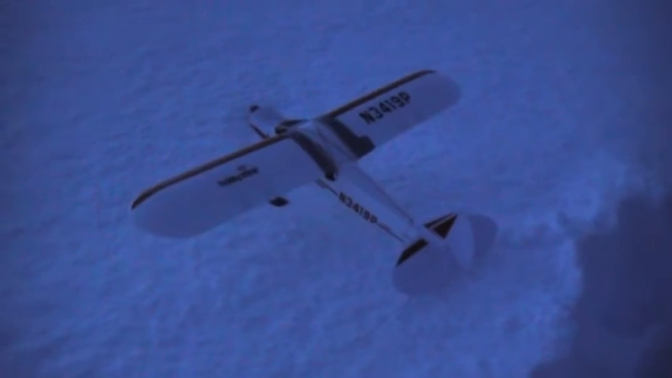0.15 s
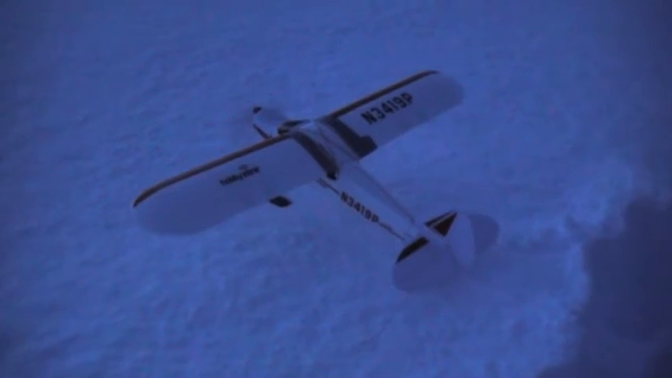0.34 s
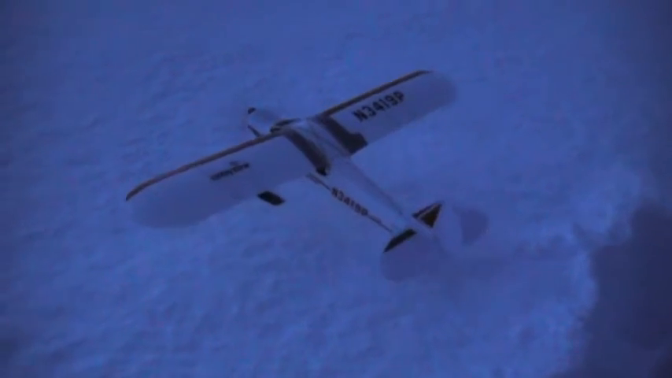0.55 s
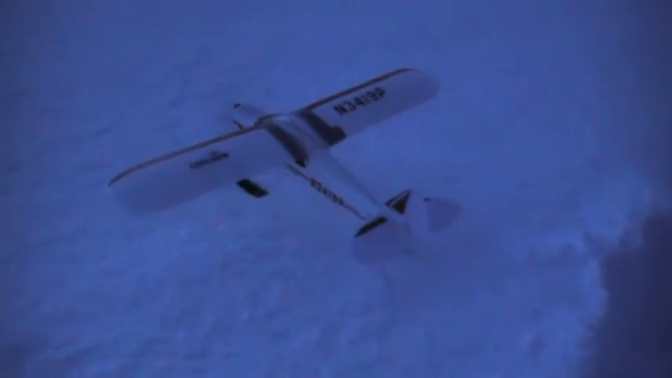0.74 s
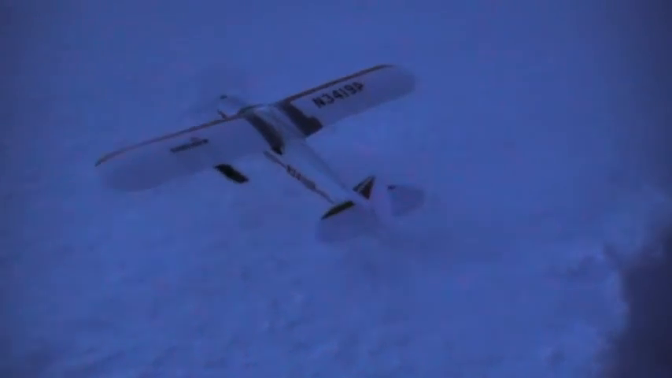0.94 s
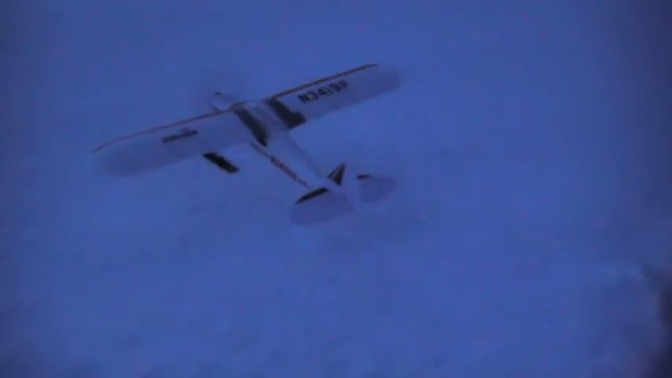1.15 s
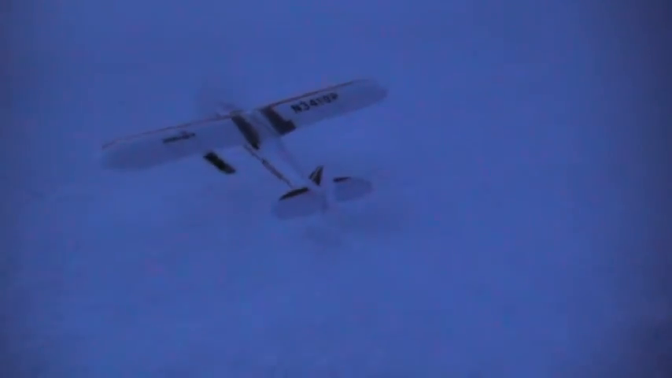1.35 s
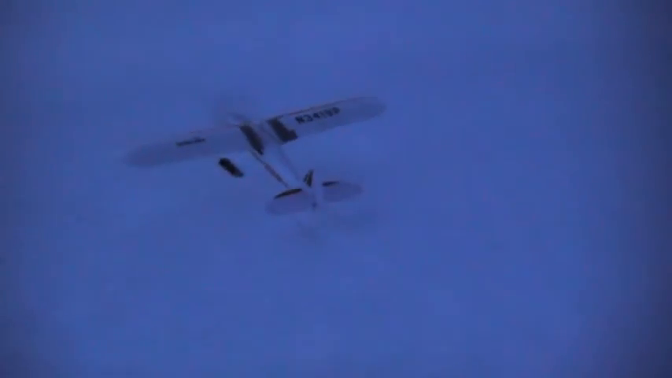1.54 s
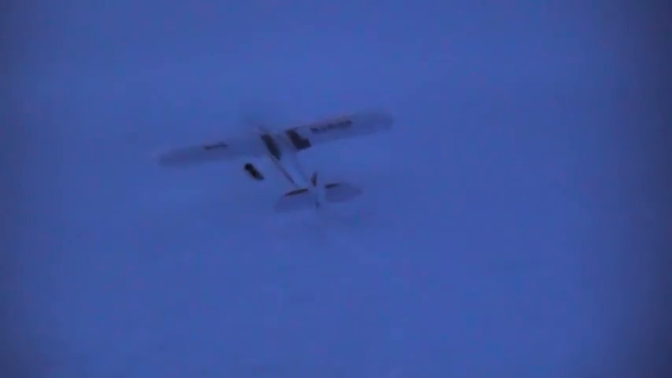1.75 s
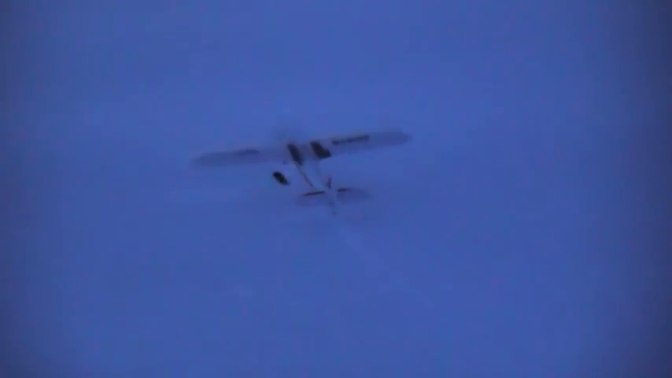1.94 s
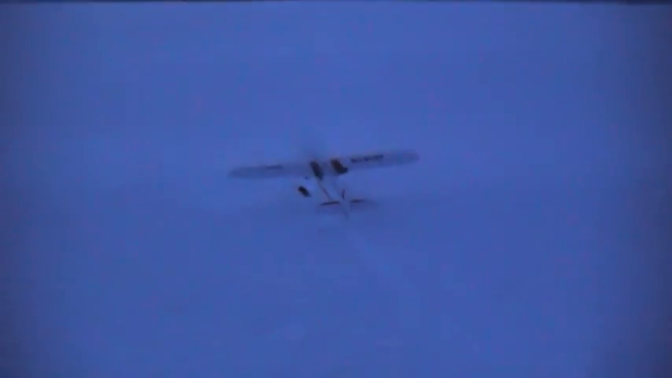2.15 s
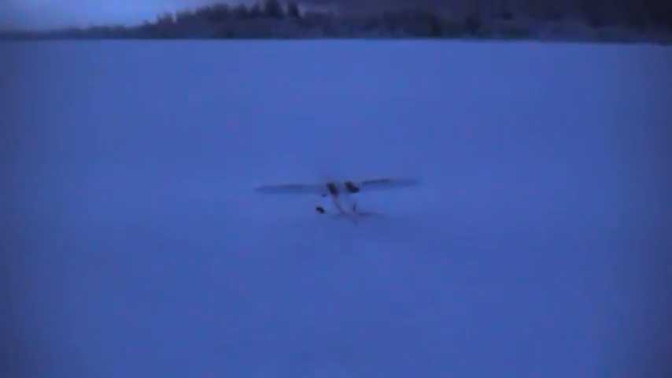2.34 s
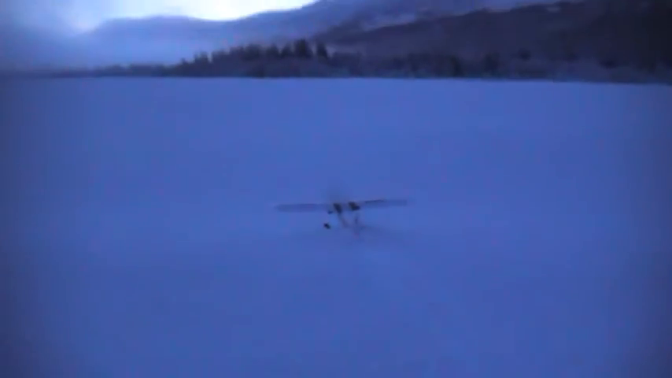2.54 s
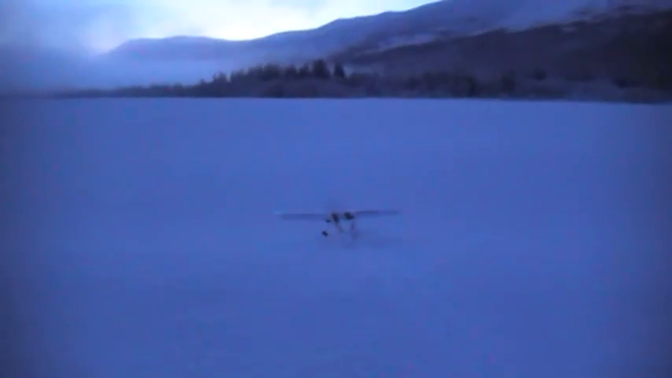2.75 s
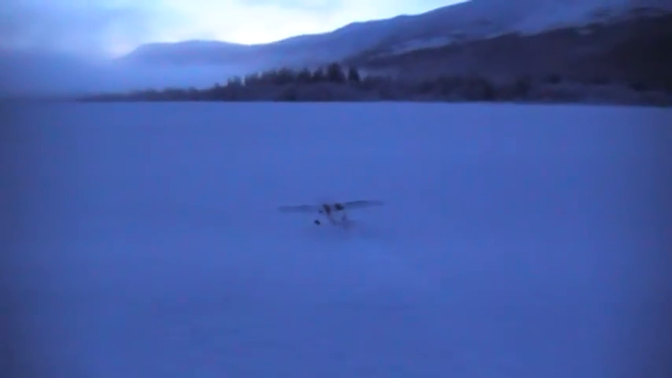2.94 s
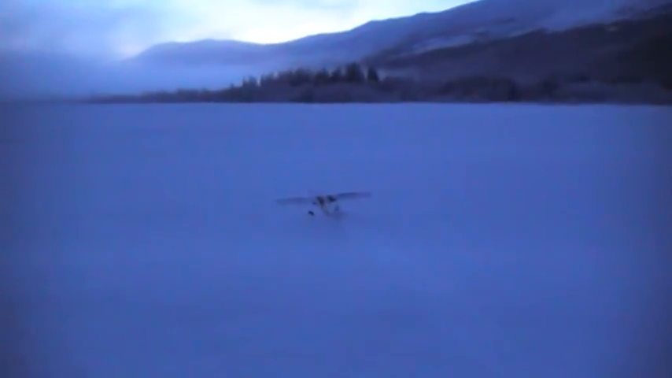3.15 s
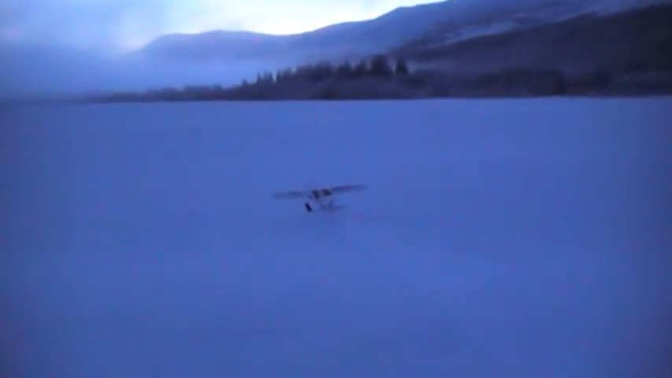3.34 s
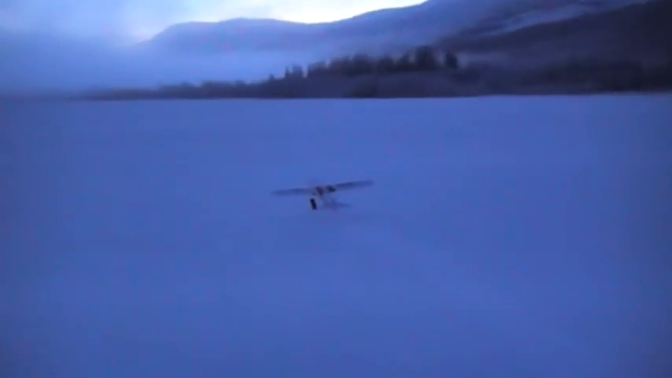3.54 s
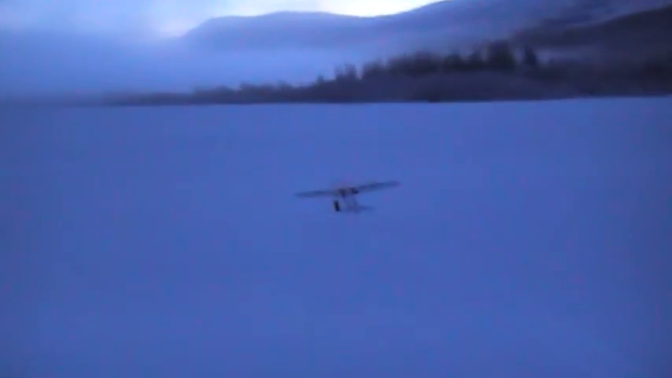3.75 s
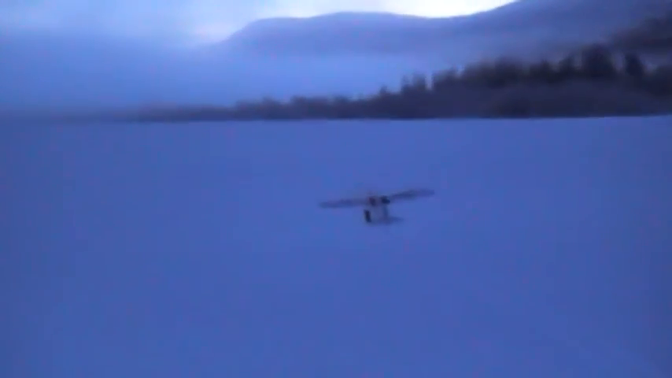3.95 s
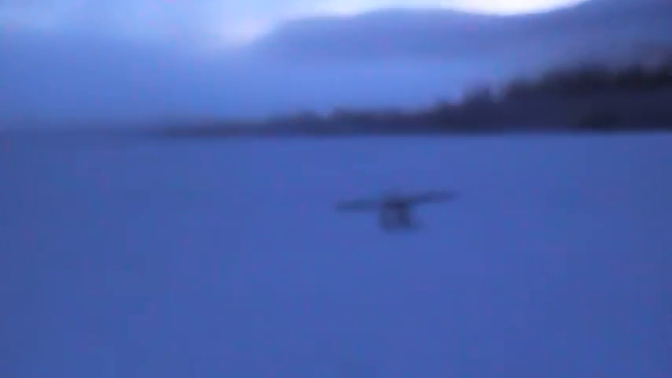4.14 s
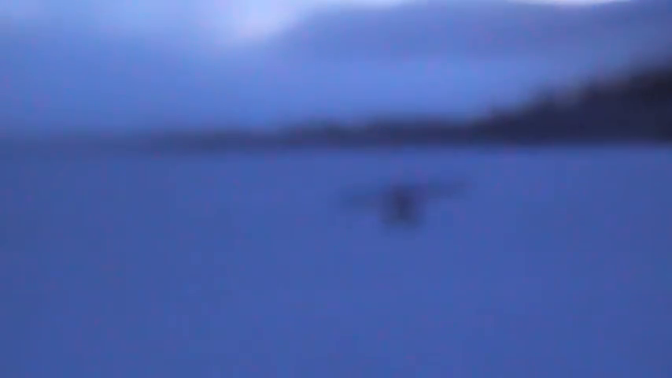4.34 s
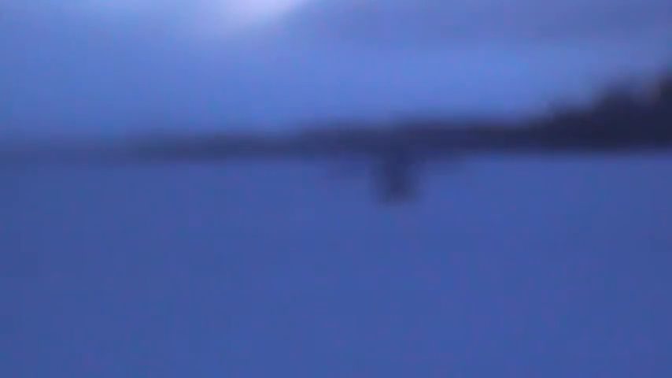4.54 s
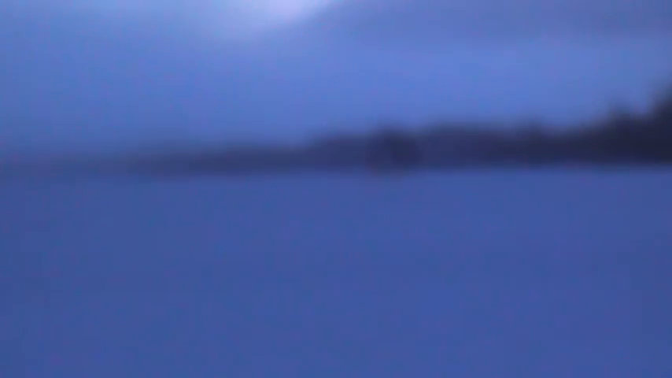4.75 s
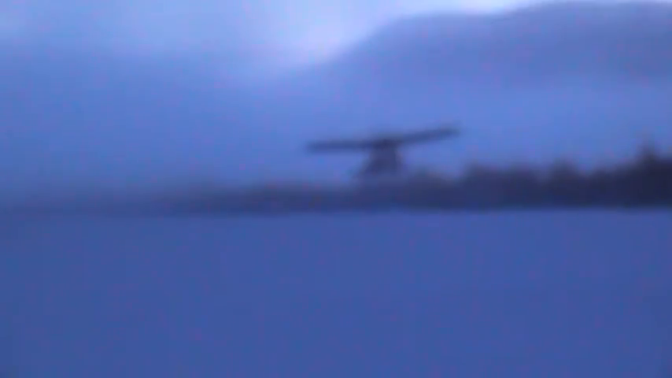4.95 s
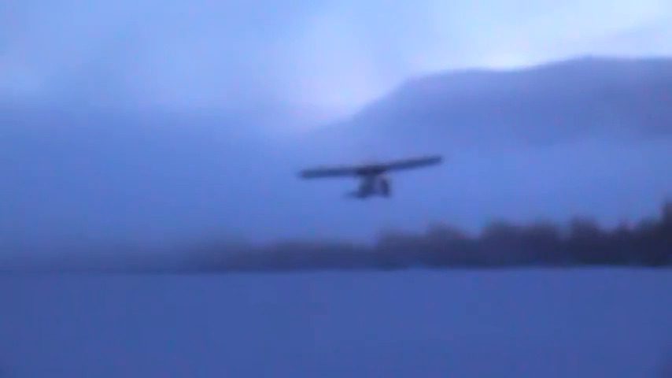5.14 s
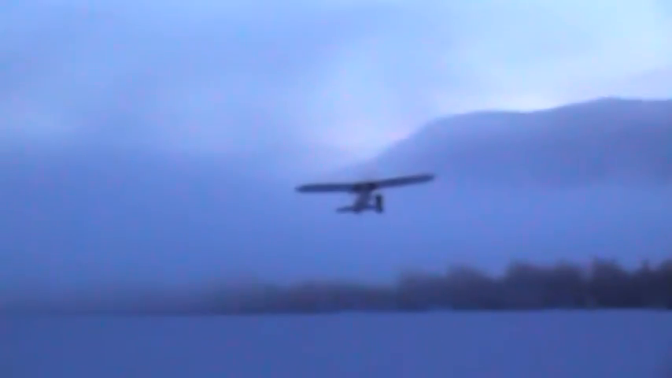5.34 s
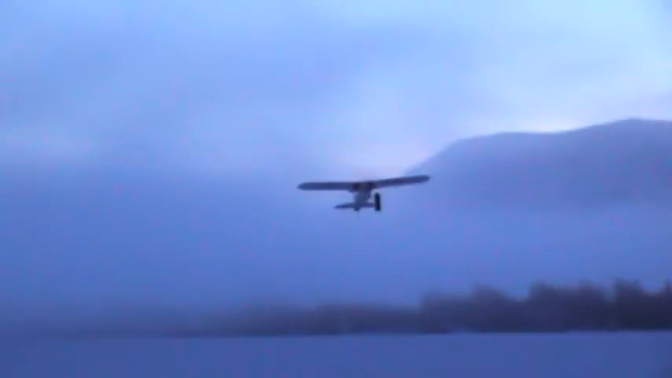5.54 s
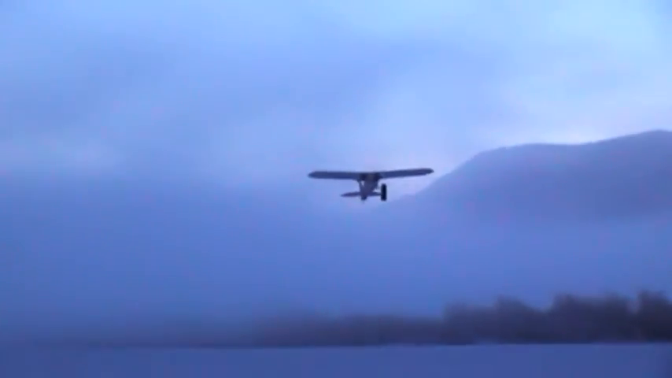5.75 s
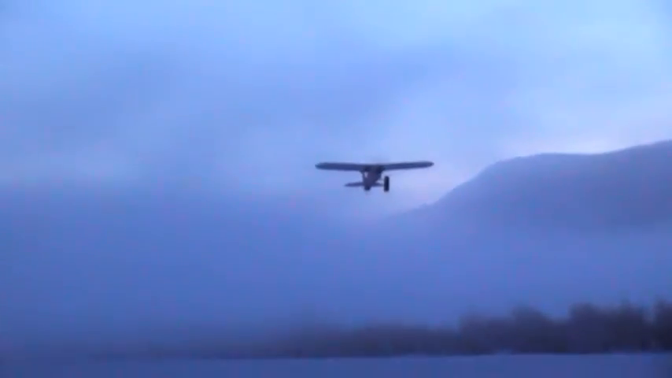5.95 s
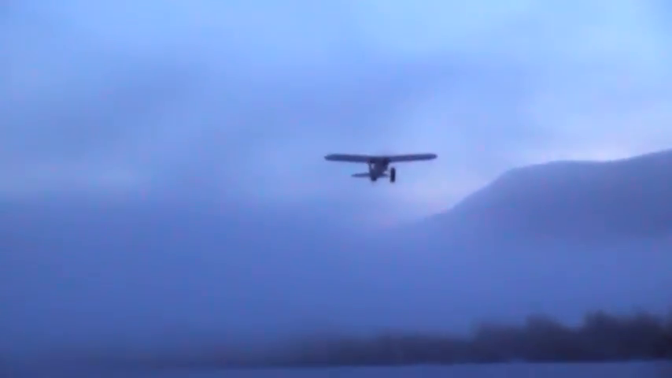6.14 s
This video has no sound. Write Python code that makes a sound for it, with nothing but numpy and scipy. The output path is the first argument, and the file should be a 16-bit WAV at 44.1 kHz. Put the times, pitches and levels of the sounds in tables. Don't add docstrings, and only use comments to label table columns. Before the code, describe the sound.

At 0 s a small electric model plane is already running close by on snow, with a rough, buzzing motor whine that climbs quickly until about 0.8 s. A thin singing tone near 1 kHz accompanies the rise, stuttering briefly around 0.5 and 0.6 s before vanishing. The motor then holds a nearly steady, piercing whine, with strong tones around 2.5 and 5 kHz, a low propeller buzz, fizzy treble and rushing air. From about 1.3 s it moves away, its brightness swelling and dipping. Fingers knock the plastic camera body in a flurry at 2.6-2.9 s, the sharpest near 2.6, with smaller taps at 3.2, 3.4 and 4 s and faint ones later. Around 3.8 s it lifts off; the shrinking sound turns hollow and phasey, duller after 4.9 s, still whining faintly at 6.3 s over light hiss.

```python
import sys
import numpy as np
from scipy import signal
from scipy.fft import rfft, irfft
from scipy.io import wavfile
from scipy.ndimage import uniform_filter1d, map_coordinates

SR = 44100
rng = np.random.default_rng(int(sys.argv[2]) if len(sys.argv) > 2 else 0)


def inscribe(sig):
    pcm = np.round(np.clip(np.atleast_2d(sig).T, -1, 1) * 32767)
    wavfile.write(sys.argv[1], SR, pcm.astype(np.int16))


def invert_db(level):
    return 10 ** (np.asarray(level, dtype=float) / 20)


N = 277389
STEPS_PER_TURN = 36
FRAMES, POINTS, LINES_MAX = 256, 8192, 340


def curves(table, s):
    t, *columns = np.transpose(table)
    return [np.interp(s, t, column) for column in columns]


def on_log(table, hz):
    table_hz, value = np.transpose(table)
    return np.interp(np.log(hz + 1), np.log(table_hz + 1), value)


def unit(x):
    return x / np.std(x)


def swings(table, s):
    return sum(db * np.exp(-((s - at) / length) ** 2) for at, db, length in table)


# frequency in Hz, density in dB per Hz.
FLOOR = [(15, -16), (70, -6.5), (200, -10.5), (500, -4), (1500, -13.5), (4000, -17), (9000, -16),
         (15500, -28)]


def floor(level_db=-55.5, side_share=0.41):
    colour = invert_db(on_log(FLOOR, np.fft.rfftfreq(N, 1 / SR)))
    mid, side = (unit(irfft(rfft(rng.standard_normal(N)) * colour, N)) for _ in range(2))
    return invert_db(level_db) * (mid + side_share * side * np.array([[1], [-1]]))


# start in seconds, peak in dB, shell pitch in Hz,
# thump in dB and click in dB relative to the peak.
KNOCKS = [(2.569, -35, 619, -18, 8), (2.582, -19.5, 345, -29, -4), (2.639, -33.5, 272, -13, 6),
          (2.679, -36, 277, -4, -6), (2.748, -25.5, 262, -23, -5), (2.781, -28.5, 315, -19, -1),
          (2.869, -36.5, 272, -16, 3), (2.889, -41, 611, -9, 2), (2.911, -28, 678, -16, -5),
          (2.943, -27.5, 700, -3, 2.5), (3.236, -26.5, 247, -14, 1.5), (3.391, -34, 670, -22, -3),
          (3.958, -41, 550, -16, 3), (4.759, -53, 408.5, -16, 13), (5.389, -44, 409, -17, -5),
          (5.827, -33.5, 403, -19, -7)]


def knocks(t60=0.02, thump_hz=70, thump_t60=.07, click_hz=1000, click_t60=0.019, crack_db=-1, crack_s=0.0029):
    out = np.zeros(N)
    t = np.arange(int(.15 * SR)) / SR
    rise = 1 - np.exp(-t / 0.00076)
    dull = signal.butter(2, [200, 1800], "band", fs=SR, output="sos")
    for start_s, db, shell_hz, thump_db, click_db in KNOCKS:
        modes = [(shell_hz, db, t60),
                 (thump_hz, db + thump_db - 4, thump_t60),
                 (click_hz, db + click_db, click_t60)]
        ring = sum(invert_db(d) * np.sin(2 * np.pi * f * t) * 1000 ** (-t / decay) for f, d, decay in modes)
        grit = unit(signal.sosfilt(dull, rng.standard_normal(len(t))))
        crack = invert_db(db + click_db + crack_db) * grit * np.exp(-t / crack_s)
        out[int((start_s + .002) * SR):][:len(t)] += 1.29 * rise * (ring + crack)
    return out


# time in seconds, swing in dB, length in seconds.
WING = [
    (.508, -18, 0.018),
    (.635, -11, .025),
]


def wing(t, tone_hz=975, level_db=-29.5, db_per_s=-14):
    fade = np.clip((.8 - t) / 0.079, 0, 1)
    level = np.sqrt(2) * invert_db(level_db + db_per_s * t + swings(WING, t))
    return level * fade * np.sin(2 * np.pi * tone_hz * t)


# time in seconds, motor steps in Hz.
TURN = [(0, 1750), (.1, 1833), (.2, 1893), (.3, 1992), (.4, 2148), (.5, 2277), (.6, 2370), (.7, 2471),
        (.77, 2499), (.93, 2507), (1.1, 2495), (1.5, 2479), (2.1, 2459), (3.15, 2439), (4.3, 2441),
        (4.7, 2447), (5.6, 2436), (6.29, 2437)]


def step_rate(s):
    return curves(TURN, s)[0]


def missing(s, full_hz=2500, start_hz=1750):
    return np.clip((full_hz - step_rate(s)) / (full_hz - start_hz) * (s < 1), 0, 1)


# time in seconds, loss by distance in dB,
# shading of the treble in dB.
FLIGHT = [(0, -0.5, -5.5), (.33, 0.5, -1.5), (.8, 0, -1), (1.35, 3, -2), (1.6, 4.5, -1), (1.95, 4.5, -4),
          (2.3, 6, -3), (2.55, 7, -8.5), (2.9, 8.5, -6.5), (3.25, 9.5, -7.5), (3.73, 12, -5.5),
          (4.05, 15, -3.5), (4.5, 16.5, -5.5), (4.9, 20, -10.5), (5.1, 20.5, -11.5), (5.3, 22, -9.5),
          (5.7, 22.5, -8), (6.29, 24.5, -8.5)]


def flight(s):
    return curves(FLIGHT, s)


# time in seconds, extra delay in ms,
# mirrored share for the weak lines.
MIRROR = [(0, 0.13, 0), (3.2, 0.073, 0.033), (3.6, 0.1, 0), (3.85, 0.21, 0.15), (4.21, .41, 0.24),
          (4.45, 0.57, 0.6), (4.76, 0.81, 0.31), (4.9, 0.98, 0.61), (5.1, 1.036, 0.85), (5.7, 1.23, 0.58),
          (6.29, 1.35, 0.35)]


def mirror(s):
    lag_ms, share = curves(MIRROR, s)
    return lag_ms / 1000, share


def comb(hz, lag_s, share):
    return np.abs(1 - share * np.exp(-2j * np.pi * hz * lag_s))


def glance(s, hz, share, snow_share=0.79, glance_db=7):
    flatness = 1 - np.exp(-np.abs(flight(s)[0]) / glance_db)
    return 20 * np.log10(comb(hz, mirror(s)[0], np.clip(share * snow_share * flatness, 0, .95)))


# time
# in seconds, frequency in Hz, gain in dB, length in seconds.
FACES = [(0, 1532, 17, 0.29), (1.95, 1600, 5, .25), (3, 1532, -14, 0.47), (3.5, 1532, 6, 0.35),
         (5, 1532, -4, 0.46), (0, 1750, -14, 0.054), (.35, 2070, -16, .06), (.47, 2235, -9, .08),
         (4, 2370, -15, 0.047), (1.45, 2500, -4.5, 0.24), (1.7, 2815, -5, 0.22), (3.5, 2900, -10.5, 0.34),
         (0.3, 415, 21, 0.13), (0, 3215, 8, 0.12), (-0.2, 3215, -6, .15), (1.45, 3215, -11, 0.39),
         (3.5, 3215, 6, 0.17), (4.5, 3215, 7, 0.19), (5.5, 3300, 1.5, .25), (-0.5, 4320, -7, 0.35),
         (1, 4320, 3.5, 0.21), (2.8, 4320, 4.5, .25), (2, 4900, -12, 0.43), (1.8, 4930, 6, .5),
         (2.55, 4860, -17, .25), (.95, 7700, -7.5, 0.093), (1, 9440, -9, 0.65), (2.7, 9696, 3.5, 0.37),
         (3.7, 9696, 6, 0.26), (6.29, 9696, 11, 0.45)]


def facing(hz, s, width=.07):
    return sum(swings([(at, db, length)], s) * np.exp(-(np.log(hz / f) / width) ** 2)
               for at, f, db, length in FACES)


# frequency in Hz, width in Hz, level in dB.
BODY = [(406, 920, -3), (873, 130, -1), (1525, 304, 5.5), (1833, 450, 5.5), (2623, 670, 6.5),
        (3210, 466, 9.5), (4314, 490, 3.5), (4935, 440, 0), (6700, 470, 5), (8090, 650, 3.5),
        (9650, 590, 4), (10110, 800, 0), (12050, 820, -4.5), (14480, 560, -6.5)]


def body(hz, bell_hz, s, bell_width_hz=730, bell_db=10, valley_db=-27):
    power = invert_db(2 * valley_db) + 0 * hz
    for f, width, db in BODY + [(bell_hz, bell_width_hz, bell_db)]:
        power = power + invert_db(2 * (db + facing(f, s))) / (1 + (2 * (hz - f) / width) ** 2) ** 1.327
    return np.sqrt(power) * (hz < 16500)


BAND_EDGES_HZ = (1200, 5800, 8700)


def bands(hz):
    steps = [1 / (1 + (edge / (hz + 1)) ** 24) for edge in BAND_EDGES_HZ]
    return -np.diff([1 + 0 * hz] + steps + [0 * hz], axis=0)


# level at full revs in dB, share of the distance loss,
# share of the shading, extra at the start of the spin-up in dB, power of the missing revs.
RANGES = [
    (-28.5, 1.25, 0.019, -2.5, 0.19),
    (-19.5, 0.99, 0.0069, -2, 1),
    (-13, 1.26, .2, -5, 0.95),
    (-19, 0.98, 1, -3.5, 0.84),
]
# time in seconds, centre in Hz.
BELL = [(0, 6830), (.1, 6940), (.18, 8150), (.33, 8430), (.4, 6770), (.8, 7280), (1.9, 7520), (2.3, 7200),
        (3.2, 6750), (3.7, 7500), (4.2, 7700), (4.35, 6900), (6.29, 6960)]
# time in seconds, swing in dB, length in seconds.
FADES = [(.1, -3, .07), (.38, -1.5, 0.026), (.85, -3.5, 0.21), (1.47, -3, 0.086), (1.68, -3, 0.094),
         (1.94, 0, 0.077), (2.28, 3.5, 0.17), (2.47, -5.5, 0.068), (2.88, 3.5, 0.22), (3.3, -4, 0.25),
         (3.73, 3, 0.11), (4.01, -1, .05), (4.16, 2.5, .07), (4.31, -2.5, .04), (4.48, -2, .05),
         (4.9, 0.5, 0.066), (5.13, -2.5, 0.046), (5.4, 2, 0.24), (5.78, -2, .1)]


def loudness(s):
    loss, shade = flight(s)
    db = np.array([full_db - far * loss + shaded * shade + start_db * missing(s) ** power
                   for full_db, far, shaded, start_db, power in RANGES])
    db[0] += glance(s, 540, .75)
    db[2] += swings(FADES, s)
    return invert_db(db), curves(BELL, s)[0]


def rush(t, angle, beat=0.45, low_hz=120, level_db=-11, start_db=7, far=0.24):
    hz = np.fft.rfftfreq(N, 1 / SR)
    colour = body(hz, 7300, 0.53) / (1 + (low_hz / (hz + 1)) ** 0.6)
    pulse = 1 + beat * np.cos(4 * np.pi * angle)
    noise = rfft(rng.standard_normal(N) * pulse) * colour
    parts = [unit(irfft(noise * share, N)) for share in bands(hz)]
    level = invert_db(level_db + start_db * missing(t) - far * flight(t)[0])
    air = level * np.sum(loudness(t)[0] * parts, axis=0)
    lag_s, share = mirror(t)
    share = share / 2
    return (air - share * np.interp(t - lag_s, t, air)) / np.sqrt(1 + share ** 2)


def drift(slow, wide):
    field = rng.standard_normal((FRAMES, LINES_MAX))
    for _ in range(2):
        field = uniform_filter1d(field, slow, axis=0)
        field = uniform_filter1d(field, wide, axis=1)
    return unit(field)


# place in the turn from 0 to 1, strength in dB.
BURSTS = [(0.03, -0.5), (.34, -4), (.68, -7), (.52, -9)]


def bursts(order, vary_db=4.0, blur=0.78, slip=0.261):
    slow_slip = slip * uniform_filter1d(rng.standard_normal(LINES_MAX), 9) * 3
    late = np.cumsum(slow_slip + blur * rng.standard_normal(LINES_MAX))
    spots = sum(invert_db(db + vary_db * drift(slow=30, wide=14)) * np.exp(-2j * np.pi * order * place)
                for place, db in BURSTS)
    spots = spots / np.sqrt(uniform_filter1d(np.abs(spots) ** 2, 8, axis=1))
    return spots * np.exp(1j * late)


# level at full revs in dB, share of the
# distance loss, extra at the start of the spin-up in dB, power of the missing revs, share of the mirror.
LEAD = [(-32, 1.39, -17, 1.2, 0.86), (-36.5, 1.1, -21, 0.63, 1.66), (-24, 1.073, -1.5, 0.82, 1.1),
        (-33.5, 0.76, -14, .2, 1), (-49.5, 0.98, 11.5, 0.2, 0.75), (-41.5, 0.96, -15, 0.56, .7),
        (-37.5, 1.51, -17, 0.48, 1.07), (-34, 1.3, -9, .6, 0.7), (-54, 0.94, 4.5, .6, 0.94),
        (-39, 0.78, -5, .4, 1.15), (-23, 1.25, -35, .3, 0.67), (-22, 1.185, -28, 1.7, 0.62)]


def leading(s, hz, beam_hz=5800):
    full_db, far, start_db, power, share = np.transpose(LEAD)
    db = full_db - far * flight(s)[0] + start_db * missing(s) ** power
    db = db + glance(s, hz, share) + facing(hz, s)
    return db + 1.3 * swings(FADES, s) * (hz > beam_hz)


# multiple of the turn, extra in dB.
STANDING = [(5, -11), (8, -0.5), (9, -4), (13, 1.5), (17, -2), (22, 3), (30, 4.5), (37, 6), (39, 5),
            (40, 5.5), (47, 3.5), (50, 7.5), (63, -1), (74, 2), (113, 6), (178, 4), (212, 3.5), (217, 9),
            (221, 3)]
STEP_DB = [9.5, 3, 8.5, 5.5, 2.5, 4, 5, -2, -7, 2]


def side_lines(s, order, own_db=2.5, patch_db=2.0, step_width=5.7,
               shudder_db=2.5, shudder_start_db=6.5, shudder_far=0.34, lift_off=(3.8, 4.5, 0.24)):
    db = own_db * drift(slow=9, wide=1) + patch_db * drift(slow=11, wide=6)
    half = STEPS_PER_TURN // 2
    from_step = (order + half) % STEPS_PER_TURN - half
    db += np.take(STEP_DB, (order + half) // STEPS_PER_TURN) * np.exp(-(from_step / step_width) ** 2)
    for multiple, more_db in STANDING:
        db[:, round(multiple)] += more_db
    shudder = shudder_db + shudder_start_db * missing(s) ** 0.32 - shudder_far * flight(s)[0]
    shudder = shudder + swings([lift_off], s)
    db[:, 5:10:2] += shudder[:, None]
    return db


LEADING_ORDERS = [2, 6, 36, 41, 3, 4, 10, 72, 7, 38, 104, 108]


def motor(t, wobble_db=-17, idle_db=-76, judder_rad=0.88, flutter_db=0.64):
    s = np.linspace(0, t[-1], FRAMES)
    s_col = s[:, None]
    order = np.arange(LINES_MAX)
    hz = step_rate(s)[:, None] / STEPS_PER_TURN * order
    gain, bell_hz = loudness(s)
    db = side_lines(s, order)
    lag_s, mirrored = mirror(s_col)
    snow = comb(hz, lag_s, mirrored / (1 + hz / 12000))
    size = invert_db(db) * body(hz, bell_hz[:, None], s_col) * snow * (order > 1)
    spots = bursts(order)
    size = size * np.abs(spots) ** 0.5
    size[:, LEADING_ORDERS] = 0

    lead = np.zeros_like(size)
    lead[:, LEADING_ORDERS] = np.sqrt(2) * invert_db(leading(s_col, hz[:, LEADING_ORDERS]))
    lead[:, 1] = lead[:, 2] * invert_db(wobble_db) + invert_db(idle_db)

    share = bands(hz)
    lead_power = np.sum(share * lead ** 2, axis=2) / 2
    rest = np.maximum(gain ** 2 - lead_power, 0.7 * gain ** 2)
    scale = np.sqrt(rest / np.sum(share * size ** 2, axis=2) * 2)
    size = lead + size * np.sum(share * scale[:, :, None], axis=0)
    size *= invert_db(flutter_db * drift(slow=2, wide=3))

    judder = judder_rad * missing(s_col) ** 0.42 * (lead == 0)
    spots *= np.exp(1j * judder * drift(slow=1, wide=2))
    spots[:, :19] = spots[0, :19]
    turn = irfft(size * spots / np.abs(spots), POINTS, axis=1) * POINTS / 2
    angle = np.cumsum(step_rate(t)) / STEPS_PER_TURN / SR
    place = [t / t[-1] * (FRAMES - 1), angle % 1 * (POINTS - 1)]
    return map_coordinates(turn, place, order=1, mode="nearest"), angle


# frequency in Hz, level in dB and phase in radians with the plane
# to the side, level in dB and phase in radians with the plane ahead.
PORTS = [(60, -1.5, 0, -1.5, 0), (400, -2.5, 0.12, -3, 0), (1300, 0, 0, 0, 0), (5600, 0, 0.017, 0, 0),
         (6500, -2, 0.27, -.5, 0.01), (8150, -3, 0.087, -1, -0.27), (8900, -6, 0.84, -7, -.15),
         (9500, -6, 1.73, -7.5, 0.5), (10500, 6.5, 0, -4, 1), (11500, 4.5, 0.6, 2, 0.3),
         (12500, 2, 0.52, 2.5, 0), (13400, -0.5, 0.057, 0, 0)]
# start in seconds, end in seconds.
AHEAD_S = (1.54, 2.7)


def through_ports(mono, t):
    spectrum = rfft(mono)
    hz = np.fft.rfftfreq(N, 1 / SR)
    columns = (on_log(np.array(PORTS)[:, [0, k]], hz) for k in range(1, 5))
    aside_db, aside_rad, ahead_db, ahead_rad = columns
    left_aside = invert_db(aside_db / 2) * np.exp(.5j * aside_rad)
    left_ahead = invert_db(ahead_db / 2) * np.exp(.5j * ahead_rad)
    aside, ahead = (irfft(spectrum * np.array([left, 1 / left]), N) for left in (left_aside, left_ahead))
    swing = np.interp(t, AHEAD_S, (0, 1))
    return (1 - swing) * aside + swing * ahead


def scene():
    t = np.arange(N) / SR
    lines, angle = motor(t)
    mono = lines + rush(t, angle) + wing(t) + knocks()
    return through_ports(mono, t) + floor()


def band_limit(x):
    return signal.sosfilt(signal.butter(12, 16130, fs=SR, output="sos"), x)


def record(dry):
    low_cut = signal.butter(3, 52, "high", fs=SR, output="sos")
    top_cut = signal.ellip(14, .3, 50, 15880, fs=SR, output="sos")
    x = signal.sosfilt(top_cut, signal.sosfilt(low_cut, dry))
    rounded = x / (1 + np.abs(x) ** 4) ** 0.48
    return band_limit(rounded)


dry = scene()
out = record(dry)
inscribe(out)
```